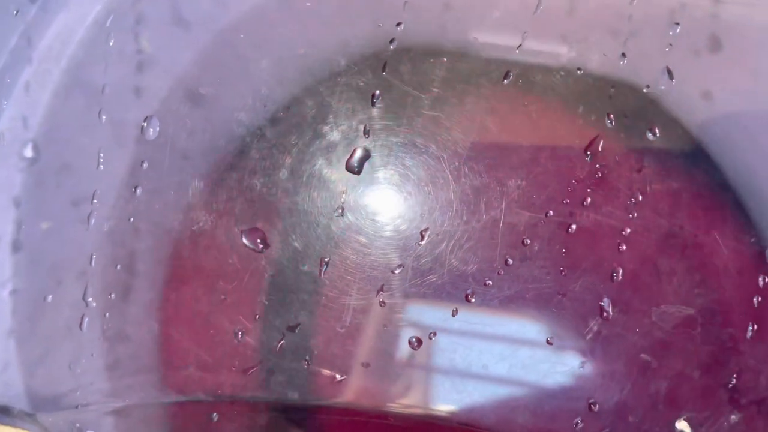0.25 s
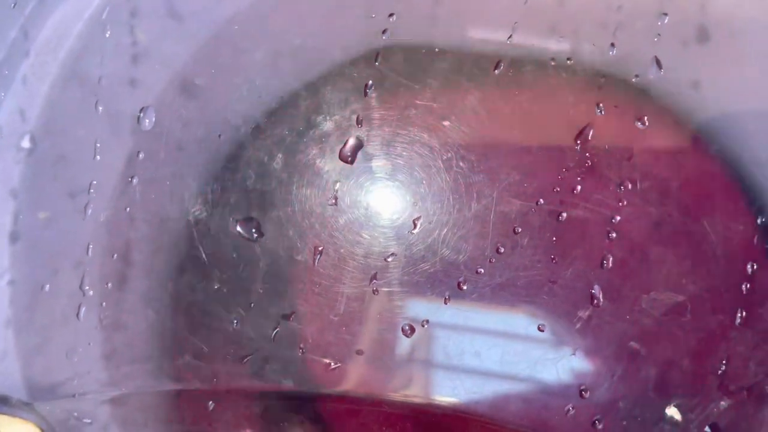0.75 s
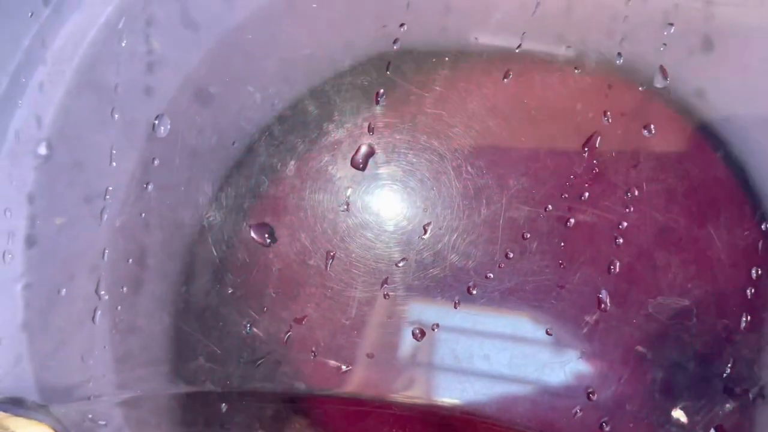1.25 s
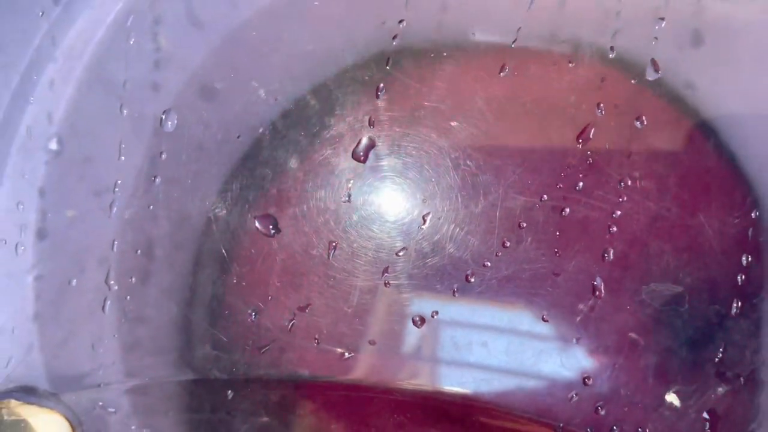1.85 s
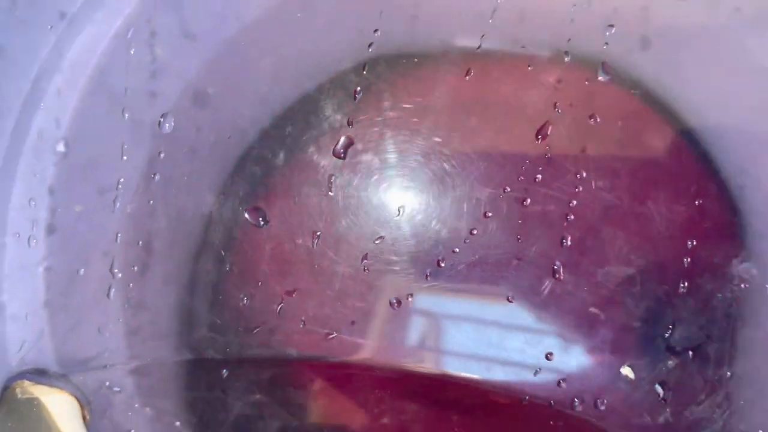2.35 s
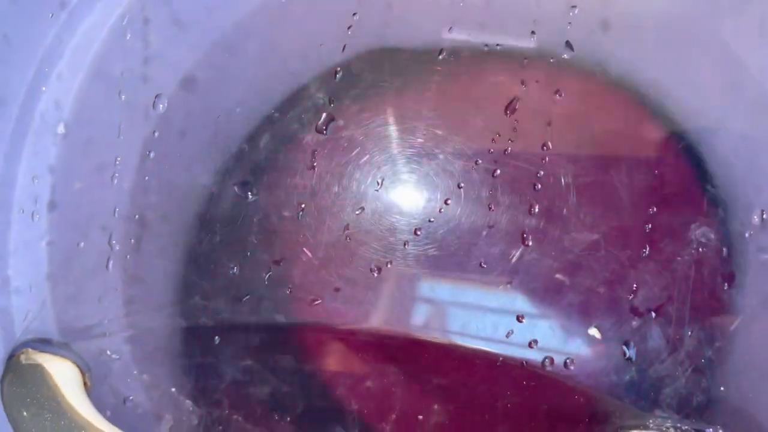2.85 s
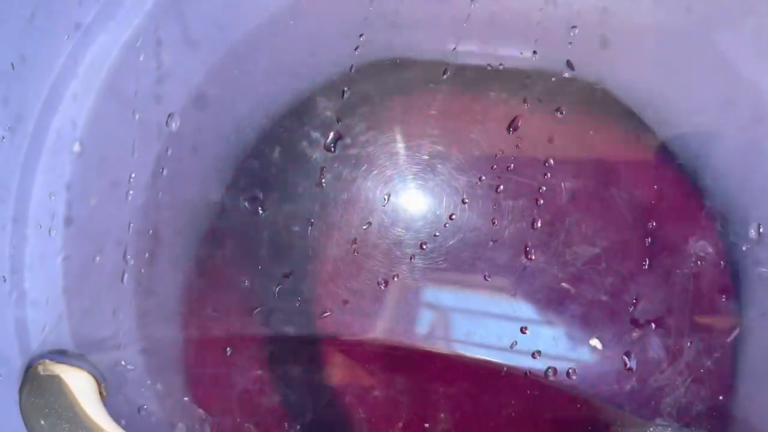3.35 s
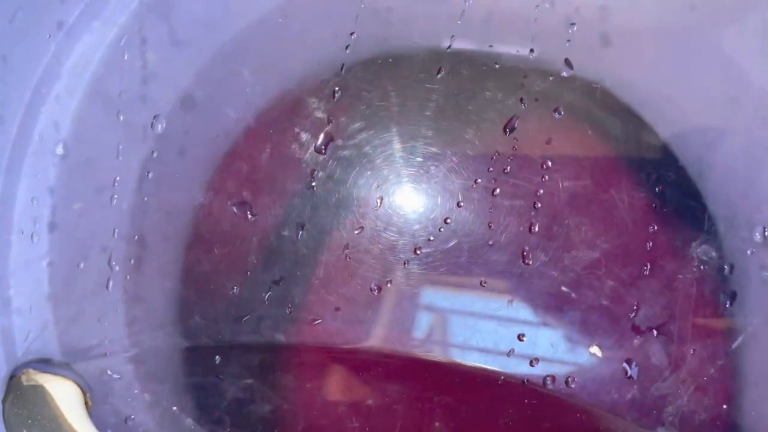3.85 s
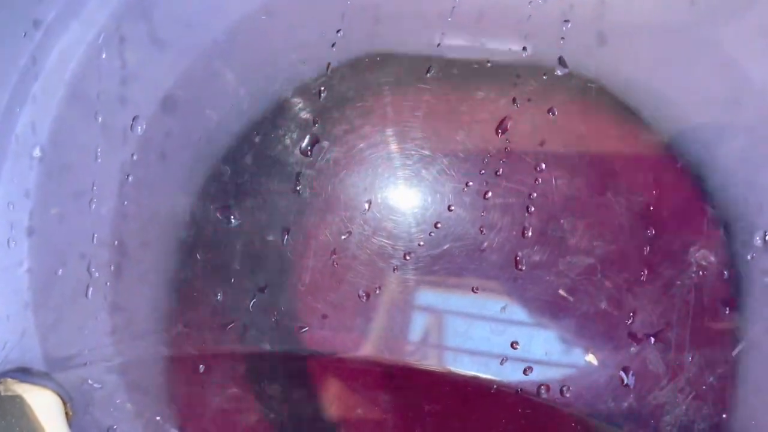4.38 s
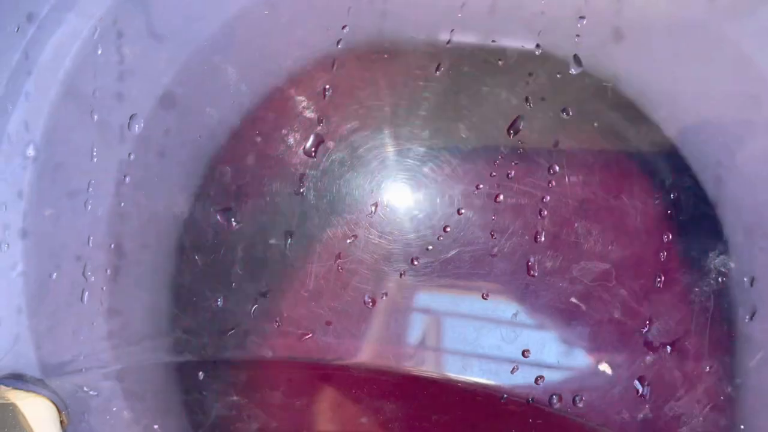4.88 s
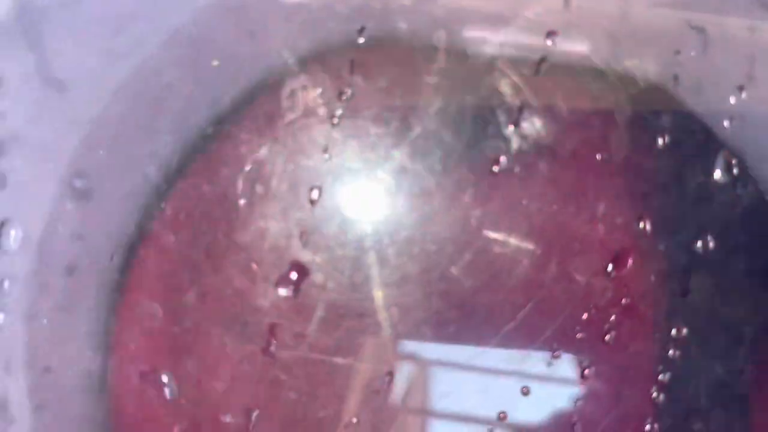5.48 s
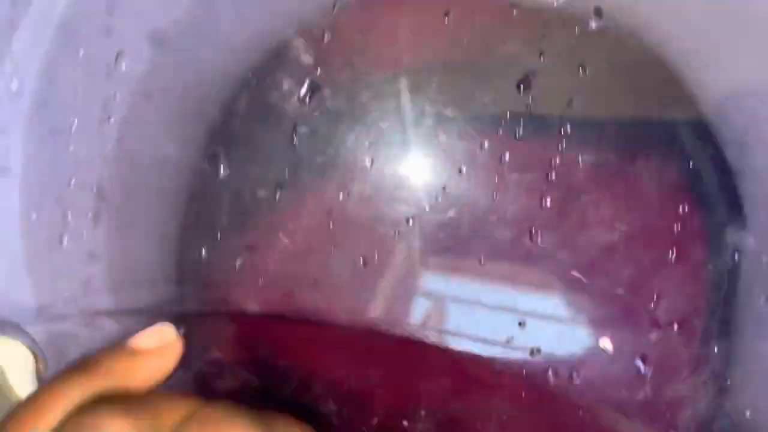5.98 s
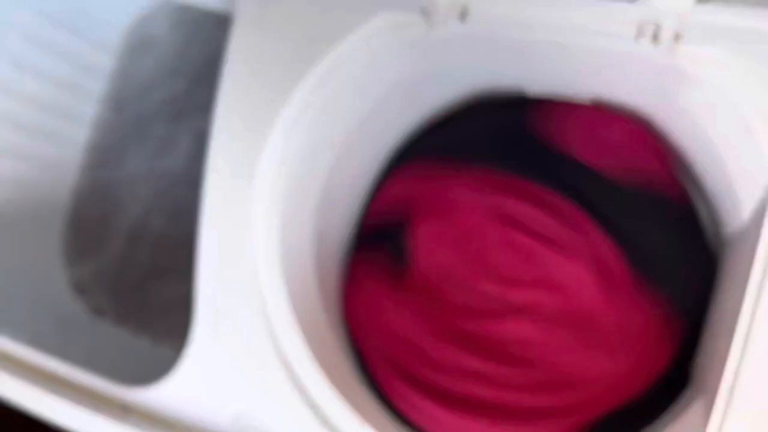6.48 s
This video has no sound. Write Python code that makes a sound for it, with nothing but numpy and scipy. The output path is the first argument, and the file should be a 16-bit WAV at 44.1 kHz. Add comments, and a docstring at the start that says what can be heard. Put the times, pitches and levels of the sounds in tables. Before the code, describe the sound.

Close beside a small plastic washer, an unbalanced spin tub whirls about ten times a second, bumping, knocking and rattling under a rush of air and spray while a timer ticks rapidly. It slows slightly. The sound drops almost to nothing for an instant, then returns softer and looser as the tub coasts. A hand knocks and lifts the plastic lid, and wet cloth swishes brightly before the air dies down.

```python
"""The spin tub of a small plastic washer whirls an uneven load, slowing a little: struck modes make its bumps,
knocks and taps, filtered noise its rattles and its whirl of air and spray. The sound dips briefly almost to
nothing and returns with the tub coasting, as a low noise swelling each turn. Ringing modes and short noise
cracks make the lid's knocks as a hand lifts it; brighter noise makes the wet cloth swish. A spring timer ticks
beside it in small puffs of noise. A pair of microphone ports hears all this close by."""
import sys
import numpy as np
from scipy import signal
from scipy.fft import rfft, irfft, next_fast_len
from scipy.io import wavfile
from scipy.ndimage import uniform_filter1d

SR = 44100
rng = np.random.default_rng(int(sys.argv[2]) if len(sys.argv) > 2 else 0)


def file_out(sig):
    """Save sig as 16-bit WAV at sys.argv[1]."""
    # one column per channel
    cols = np.atleast_2d(sig).T
    # limit, then scale
    lim = np.clip(cols, -1, 1)
    pcm = np.round(lim * 32767).astype(np.int16)
    wavfile.write(sys.argv[1], SR, pcm)


def boost(x):
    """Linear amplitude factor 10**(x/20) for a level x in decibels (scalar or array-like)."""
    u = np.asarray(x, float) / 20
    return 10 ** u


N = 296352
TIME = np.arange(N) / SR   # seconds
DIP_S, LID_UP_S = 5.447, 6.324   # the brief dip in level; the lid is up


def rms_one(x):
    """Scales to rms 1."""
    return x / np.sqrt(np.mean(x ** 2) + 1e-20)


def in_time(rows):
    """Columns of a table, whose first column is seconds, as curves over all samples."""
    s, *columns = np.transpose(rows)
    return [np.interp(TIME, s, c) for c in columns]


def drift(rate_hz):
    """Slow random wandering of spread 1: noise through two low-pass poles, made at every 40th sample."""
    r = np.exp(-80 * np.pi * rate_hz / SR)
    white = rng.standard_normal(N // 40 + 2002)
    slow = signal.lfilter([1], [1, -2 * r, r * r], white)[2000:]
    return np.interp(np.arange(N) / 40, np.arange(len(slow)), rms_one(slow))


def ring(clicks, hz, t60):
    """A unit click sets a sine of height 1 ringing; it falls by 60 dB in t60 seconds."""
    r, w = boost(-60 / (t60 * SR)), 2 * np.pi * hz / SR
    return signal.lfilter([0, np.sin(w)], [1, -2 * r * np.cos(w), r * r], clicks + 1e-18)


def resonance(x, hz, width_hz):
    """Band-pass of gain 1 at its top."""
    r = np.exp(-np.pi * width_hz / SR)
    feedback = [1, -2 * r * np.cos(2 * np.pi * hz / SR), r * r]
    return signal.lfilter(np.array([1, 0, -1]) * (1 - r * r) / 2, feedback, x)


def band_pass(x, low_hz, high_hz):
    """Keeps one band of a sound."""
    return signal.sosfilt(signal.butter(2, [low_hz, high_hz], "band", fs=SR, output="sos"), x)


def burst(clicks, t60, rise_s):
    """Each click starts a puff of noise that swells quickly and dies away."""
    rise = np.exp(-1 / (rise_s * SR))
    fall = signal.lfilter([1], [1, -boost(-60 / (t60 * SR))], clicks + 1e-18)
    return rng.standard_normal(N) * signal.lfilter([1 - rise], [1, -rise], fall)


def firmness_db(s, firmest_db, firmest_s, fade_db):
    """A contact weakens with the square of the time from its firmest moment."""
    return firmest_db - abs(fade_db) * (s - firmest_s) ** 2


def passes_of(turns, fraction):
    """Samples at which the tub passes one place in its turn."""
    return np.flatnonzero(np.diff(np.floor(turns - fraction)) == 1)


def track(turns, wear_turns):
    """Roughness around the rim: nearly the same noise returns each turn, blending slowly into another."""
    rims = rng.standard_normal((12, 4400))
    place = ((turns % 1) * (rims.shape[1] - 1)).astype(int)
    age = np.clip(TIME * 10 / wear_turns, 0, len(rims) - 1.001)   # counts about 10 turns per s
    first, blend = age.astype(int), np.pi / 2 * (age % 1)
    return np.cos(blend) * rims[first, place] + np.sin(blend) * rims[first + 1, place]


def tub_turns():
    """Turns made so far: a slowing spin, then steady coasting; the count jumps at the dip."""
    start_turns_per_s, slowing_per_s, coast_turns_per_s = 10.3153, .015648, 8.5
    coast_turn = .86   # where in its turn the tub is after the dip
    after = TIME > DIP_S
    spin = start_turns_per_s * np.exp(-slowing_per_s * TIME)
    turns = np.cumsum(np.where(after, coast_turns_per_s, spin)) / SR
    first = turns[after][0]
    return turns + after * (np.ceil(first) - first + coast_turn)


def contacts(turns, places, modes, uneven_db):
    """Every pass of a contact place strikes the modes; neighbouring modes answer in opposite sense."""
    clicks = np.zeros(N)
    for fraction, *firmness in places:
        at = passes_of(turns, fraction)
        clicks[at] += boost(firmness_db(TIME[at], *firmness) + uneven_db * rng.standard_normal(len(at)))
    return sum((-1) ** k * boost(db) * ring(clicks, hz, t60) for k, (hz, db, t60) in enumerate(modes))


def bumps(turns):
    """Until the dip the tub bumps its soft mounts and its rim knocks the cover, ringing cabinet and cover."""
    # Where the tub bumps its soft mounts. Each row: place as a fraction of a turn, firmest level in dB,
    # firmest moment in seconds, fade in dB per second squared.
    mount_places = [(0.042, -15.6, 1.21, 3.24), (0.181, -21.9, 5.38, 3.26), (0.251, -13.4, 1.38, 3.12),
                    (0.318, -16.2, 4.41, .6), (0.386, -19.6, 2.66, .83), (0.474, -11, 2.56, .29),
                    (0.508, -14.7, 6.5, .13), (0.676, -11, .74, .25), (0.703, -9.8, .61, .47),
                    (0.798, -3.4, 1.11, 1.44), (0.828, -2.9, 1.14, 1.95), (0.892, -11, 3.79, 1.77),
                    (0.989, -16.8, 6.5, .03)]
    # Ringing modes of the cabinet. Each row: pitch in Hz, level in dB, time to fall 60 dB in seconds.
    cabinet_modes = [(57.2, -24.6, 0.5), (118.8, -9.2, 0.042), (132.9, -3.2, 0.111), (176.4, -6.4, 0.08)]
    # Where the rim knocks the tub cover. Each row: place as a fraction of a turn, firmest level in dB,
    # firmest moment in seconds, fade in dB per second squared.
    rim_places = [(0.033, -14.6, -1, .38), (0.636, -14, -1, .18), (0.756, -14.7, 2.02, 1.91),
                  (0.798, -13.1, 1.15, 2.79), (0.927, -11.3, .77, 2.24), (0.929, -13, 3.6, 7.76)]
    # Ringing modes of the cover. Each row: pitch in Hz, level in dB, time to fall 60 dB in seconds.
    cover_modes = [(249.6, -12.3, 0.097), (350.7, -9.5, 0.12), (409.7, -23.6, 0.139), (452, -20, .12),
                   (532, -22, 0.072), (790, -25, .05), (890, -24, .05)]
    bump_creep, knock_creep = .00628, .00992   # the places come later as the tub slows, turns per s
    soft = contacts(turns - bump_creep * TIME, mount_places, cabinet_modes, uneven_db=-0.27)
    firm = contacts(turns - knock_creep * TIME, rim_places, cover_modes, uneven_db=-1.0)
    dull = signal.sosfilt(signal.butter(2, 420, fs=SR, output="sos"), soft)
    hard = signal.sosfilt(signal.butter(2, 160, "high", fs=SR, output="sos"), firm)
    return -(dull + hard) * (TIME < DIP_S)   # turned over: each starts as a suction


def taps(turns, uneven_db):
    """Small parts of the tub tap once a turn; each tap rings the modes nearest its pitch most."""
    # The tapping parts. Each row: place as a fraction of a turn, pitch in Hz, firmest level in dB,
    # firmest moment in seconds, fade in dB per second squared.
    tap_places = [(.39, 380, -22, 5.7, -0.5), (0.133, 340, -20, 4.9, 3), (0.61, 340, -23.5, 5.1, 9),
                  (0.133, 351, -29, 1.2, -5.5), (.49, 580, -22, 0.39, 10), (.665, 534, -28.5, 2.3, 0.5),
                  (1, 260, -29, 1.6, 1), (0.058, 510, -31.5, 1.2, 2), (0.27, 380, -24, 4.4, 18),
                  (0.72, 544, -23.5, 4.7, 5.5), (0.42, 440, -25, 5.9, -0.5), (0.0315, 390, -32, 6.5, 2),
                  (0.45, 744, -31.5, 5.3, 1.5), (0.66, 690, -23, 0.35, 10), (.76, 596, -27, 4.8, 1.5),
                  (1, 610, -28, 1.4, 6), (.595, 850, -26.5, 4.8, 7), (.69, 880, -24.5, 5.2, 4),
                  (0.78, 895, -27, 1, 0.5), (0.45, 830, -22, 0.88, 1), (0.0338, 970, -29, 0.76, 0),
                  (0.49, 1030, -37, 0.48, -7), (.455, 1060, -33.5, 7, -2), (0.55, 895, -27, 4.2, -2),
                  (0.57, 610, -54, 3.2, 13), (.76, 1020, -31, 1.2, 1.8), (0.0652, 1210, -31, 0.53, 2),
                  (0.0255, 1410, -23, 4.6, 2), (0.0453, 1590, -32, 3, 3), (0.31, 1590, -34, 2.3, 0.5),
                  (0.76, 1590, -38, 0.48, 0), (0.54, 1590, -43.5, 4.3, -12), (.445, 2700, -26, 2.6, 0.5),
                  (.445, 1190, -28, 4.1, 2.5)]
    # Ringing modes of those parts. Each row: pitch in Hz, level in dB, time to fall 60 dB in seconds.
    part_modes = [(341.5, -0.5, 0.081), (351.2, 1.5, 0.054), (446.7, 3, 0.063), (537, -1, 0.033),
                  (612, 0, .05), (663, 0.5, 0.048), (796, -5.5, 0.11), (896, 1.5, 0.047),
                  (1047, 2.5, 0.028), (1080, 0.5, 0.07), (1228, -2, 0.053), (1605, 0, 0.042),
                  (2620, 6, .01), (2930, 3, 0.01)]
    creep, db_per_octave = .006, 45   # places come later, turns per s; loss away from the tap's pitch
    crept, out = turns - creep * TIME, 0
    strikes = []
    for fraction, pitch_hz, *firmness in tap_places:
        at = passes_of(crept, fraction)
        force_db = firmness_db(TIME[at], *firmness) + uneven_db * rng.standard_normal(len(at))
        strikes.append((at, force_db, pitch_hz))
    for k, (hz, mode_db, t60) in enumerate(part_modes):
        clicks = np.zeros(N)
        for at, force_db, pitch_hz in strikes:
            clicks[at] += boost(force_db + mode_db - db_per_octave * abs(np.log2(hz / pitch_hz)))
        out = out + (-1) ** k * ring(clicks, hz, t60)
    return out * (TIME < LID_UP_S)


def rattles(turns, uneven_db, loose_hz):
    """Rim roughness shakes loose parts over an arc of each turn; the higher parts repeat less exactly."""
    # Resonances of the loose parts. Each row: pitch in Hz, width in Hz, level while coasting in dB.
    loose_parts = [(1209, 134, -31.5), (368.2, 41, -33.5), (246.4, 98, -43), (535, 80, -38),
                   (2570, 1100, -35), (1042, 105, -38), (886, 85, -38), (1563, 190, -44), (9860, 4700, -52),
                   (450, 40, -53), (3166, 120, -47), (3166, 79, -46), (3870, 190, -53), (3930, 61, -57),
                   (597, 70, -36), (1081, 46, -41.5)]
    # When each part rattles or rubs. Each row: place as a fraction of a turn, length in turns,
    # firmest level in dB, firmest moment in seconds, fade in dB per second squared.
    rubs = [(0.471, 0.035, -35.5, 3.8, 1.5), (0.73, 0.22, -31, 0.22, 0.8), (0.904, 0.26, -30.5, 6.6, 0.5),
            (0.65, 0.08, -33, 0.88, 1), (0.029, 0.058, -32, 0.052, -3.5), (0.079, 0.037, -31.5, 0.3, -3.5),
            (0.56, 0.057, -30.5, 3.9, 4), (1.009, 0.067, -40.5, 1.3, -0.1), (0.45, 0.042, -32, 3, -20),
            (0.47, 0.14, -35.5, 4.5, .5), (0.415, 0.069, -38.5, 5.1, -0.5), (0.983, 0.058, -38.5, 4.6, .4),
            (0.41, 0.04, -38.5, 4.5, .5), (0.885, 0.032, -38, 3.9, 3.2), (0.516, 0.093, -31.5, 2.5, .1),
            (0.43, 0.077, -39.5, 4, 0.7)]
    settle_s = 0.49   # the levels ease to coasting
    out, rough = 0, track(turns, wear_turns=8.89)
    settled = np.clip((TIME - DIP_S) / settle_s, 0, 1)
    for (hz, width_hz, coast_db), (fraction, length, *firmness) in zip(loose_parts, rubs):
        since = ((turns - fraction + length) % 1) / length
        arc = since * np.exp(1 - since)   # swells to 1, then dies away
        repeat = np.exp(-(hz / loose_hz) ** 2)
        source = np.sqrt(repeat) * rough + np.sqrt(1 - repeat) * rng.standard_normal(N)
        level_db = (1 - settled) * firmness_db(TIME, *firmness) + settled * coast_db
        level_db = level_db + uneven_db * drift(2.8)
        noise = rms_one(resonance(resonance(source, hz, width_hz), hz, width_hz))
        # evens out the noise's level over about 20 ms
        local_level = np.sqrt(uniform_filter1d(noise ** 2, size=900) + 0.11)
        out = out + boost(level_db) * arc * noise / local_level
    return out * (TIME < LID_UP_S)   # the raised lid silences the rattles


def whirl_strength():
    """Level, treble and swish in dB: falling with the spin, lower when coasting, brightened by wet cloth."""
    # Swishes of wet cloth. Each row: middle in seconds, half length in seconds,
    # extra dB in the highest bands (less in lower ones).
    cloth = [(6.455, 0.094, 6.5), (6.578, 0.05, 13), (6.72, 0.13, 10.5)]
    spin_db, loss_db_per_s, coast_db = -27, 0.56, -31
    still_s, still_loss_db_per_s = 6.66, 79   # the air comes to rest
    spinning = TIME < DIP_S
    level_db = np.where(spinning, spin_db - loss_db_per_s * TIME, coast_db)
    level_db = level_db - still_loss_db_per_s * np.maximum(TIME - still_s, 0)
    swish_db = sum(db * np.maximum(1 - np.abs(TIME - s) / half_s, 0) for s, half_s, db in cloth)
    return level_db, np.where(spinning, -5, -3.7), swish_db


def whirl(turns, patchy_db, spray_db):
    """Air and spray: third-octave noise bands that flicker partly together; droplets add fine clicks."""
    # Tone colour of the air, before the whole is set to its level. Each row: pitch in Hz, level in dB per Hz.
    colour = [(40, -38), (75, -4), (150, -6.5), (290, -16), (370, -12), (480, -18), (610, -11), (850, -12),
              (980, -17), (1200, -18.5), (1900, -21.5), (2600, -16), (3000, -14), (3900, -22.5),
              (4700, -20), (6400, -22.5), (8000, -23), (11000, -20), (12200, -23.5), (13300, -49),
              (14500, -59)]
    strict_hz, strict_share = 1700, .7   # the duller rumble returns nearly alike each turn
    pump_db, pump_turn = 2.5, 0.62   # the lopsided load pumps the duller air once a turn
    lid_up_bass_db, bass_hz = -4, 330   # with the lid up the cabinet is no longer drummed
    level_db, treble_db, swish_db = whirl_strength()
    hz_points, db_points = np.transpose(colour)
    edges, together, out = np.geomspace(40, 15500, 27), drift(25.0), 0
    falls = rng.random(N) < 400 / SR   # about 400 drops per second
    drops = falls * boost(5.1 * np.minimum(rng.exponential(1, N), 4)) * rng.choice([-1, 1], N)
    # two sets that take turns among the bands, each of one direct and two scattered paths
    white = rng.standard_normal((2, 3, N))
    rim = np.array([[track(turns, wear_turns=7.71) for path in paths] for paths in white])
    for k, (low, high) in enumerate(zip(edges, edges[1:])):
        hz = np.sqrt(low * high)
        bright = np.clip(np.log2(hz / 900) / 2, 0, 1)
        sizzle = np.clip(np.log2(hz / 2200) / 2, 0, 1)
        strict = strict_share * np.exp(-(hz / strict_hz) ** 2) * (TIME < DIP_S)
        source = np.sqrt(strict) * rim[k % 2] + np.sqrt(1 - strict) * white[k % 2]
        source = source + bright * boost(spray_db) * rms_one(drops)
        noise = band_pass(source, low, high)
        colour_db = np.interp(np.log(hz), np.log(hz_points), db_points)
        swell_db = (1 - bright) * pump_db * np.cos(2 * np.pi * (turns - pump_turn))
        swell_db = swell_db + lid_up_bass_db * (hz < bass_hz) * (TIME > LID_UP_S)
        flicker_db = patchy_db * (bright * together + drift(42.0))
        band_db = colour_db + swell_db + bright * treble_db + sizzle * swish_db + flicker_db
        out = out + boost(band_db) * noise
    return boost(level_db) * rms_one(out)


def grumble(turns):
    """After the dip the tub rocks loosely: low noise swells once a turn, in place of the strict beat."""
    # Rocking of the coasting tub. Each row: time in seconds, level in dB of its low part before the swell.
    rocking = [(5.47, -28), (5.62, -31), (5.96, -28), (6.11, -29.5), (6.3, -36), (6.45, -42), (6.72, -43)]
    rocking_db, = in_time(rocking)
    shaking = band_pass(rng.standard_normal(N), 223, 450)
    groan = resonance(shaking, 268, 46) - 0.94 * resonance(shaking, 345, 52)   # the cover groans
    groan = groan + 0.85 * resonance(shaking, 378, 140)
    low = band_pass(rng.standard_normal(N), 78, 176)
    swell_db = 0.82 * np.cos(2 * np.pi * (turns - .3))
    rough = boost(1.0) * rms_one(low) + boost(-2.2) * rms_one(groan)
    return rough * boost(rocking_db + swell_db) * (TIME > DIP_S)


def lid():
    """Each touch makes the plastic lid thump, most in the modes near its pitch, with a short noise crack."""
    # Knocks by the rocking tub and then by the hand. Each row: time in seconds, thump strength in dB,
    # pitch in Hz, crack strength in dB; modes and filters below shape the final levels.
    touches = [(5.475, -19, 412, -21.5), (5.489, -22, 128, -38), (5.564, -21, 330, -40),
               (5.59, -17, 298, -33), (5.645, -22, 100, -36), (5.702, -16, 135, -37),
               (5.826, -23, 268, -43), (5.834, -23, 268, -43), (5.87, -30, 410, -23),
               (5.881, -11, 120, -40), (5.97, -19, 400, -34), (6.005, -17, 70, -40), (6.053, -20, 400, -36),
               (6.148, -20.5, 255, -31), (6.224, -18.5, 402, -28), (6.284, -24, 520, -36),
               (6.292, -21, 450, -32), (6.305, -23, 500, -20), (6.311, -19, 440, -33),
               (6.3243, -14, 240, -36), (6.328, -7, 98, -43), (6.3961, -11, 400, -22),
               (6.3995, -16, 200, -38), (6.4, -15, 86, -38), (6.356, -25, 700, -19), (6.387, -27, 410, -35),
               (6.395, -14, 645, -28), (6.437, -22, 700, -22), (6.446, -18.5, 500, -24),
               (6.452, -20, 440, -30), (6.491, -18, 128, -40), (6.501, -21.5, 600, -19.5),
               (6.566, -24, 400, -37), (6.6, -19.5, 560, -24), (6.609, -22, 410, -34),
               (6.63, -22, 402, -36), (6.645, -16, 134, -45), (6.654, -30, 287, -24),
               (6.679, -21.5, 600, -40)]
    # Ringing modes of the lid. Each row: pitch in Hz, level in dB, time to fall 60 dB in seconds.
    plastic_modes = [(64, -2, .12), (86, 0, .085), (128, -2, .1), (198, -3, .04), (268, 2, .1),
                     (340, -1, .03), (410, 0, .05), (510, -2, .045), (600, -2, .03), (890, -2, .045),
                     (1000, -2, .036)]
    db_per_octave = 24   # loss away from the pitch of the touch
    s, db, pitch_hz, crack_db = np.transpose(touches)
    at, out, cracks = (s * SR).astype(int), 0, np.zeros(N)
    cracks[at] = boost(crack_db)
    for hz, mode_db, t60 in plastic_modes:
        clicks = np.zeros(N)
        clicks[at] = boost(db + mode_db - db_per_octave * np.abs(np.log2(hz / pitch_hz)))
        out = out + ring(clicks, hz, t60)
    snap = burst(cracks, 0.014, rise_s=0.00014)
    return out + boost(9.0) * resonance(snap, 1700, 1800) - boost(1.5) * resonance(snap, 9400, 5000)


def timer(weak_db, uneven_db, t60):
    """Tick and tock, every second beat weaker, shake the timer's small metal parts for some milliseconds."""
    # Pace of the ticking. Each row: start in seconds, beats per second.
    pace = [(0, 39.57), (3.2, 39.16), (4.119, 41.29), (5.42, 39.45)]
    # Strength of the strong beats, before a fixed boost. Each row: time in seconds, level in dB.
    strong_beats = [(0, -34), (1.2, -33.5), (2.5, -32.5), (4, -31), (5.2, -29), (6.3, -34)]
    # Resonances of the metal parts. Each row: pitch in Hz, width in Hz, level in dB.
    metal_parts = [(2510, 350, 1.5), (3720, 560, 0), (6430, 710, 0), (8580, 206, 11), (10460, 3050, -4)]
    beats_at_start, last_beat = -.22, 253
    from_s, rate = np.transpose(pace)
    beats = beats_at_start + np.cumsum(rate[np.searchsorted(from_s, TIME, "right") - 1]) / SR
    beat = np.arange(1, last_beat + 1)
    at_s = np.interp(beat, beats, TIME) + 0.00065 * rng.standard_normal(last_beat)
    clicks = np.zeros(N)
    beat_db = weak_db * (beat % 2 == 0) + uneven_db * rng.standard_normal(last_beat)
    clicks[(at_s * SR).astype(int)] = boost(beat_db)
    puffs = boost(in_time(strong_beats)[0] + 15.5) * burst(clicks, t60, rise_s=0.00056)
    return sum((-1) ** k * boost(db) * resonance(puffs, hz, width)
               for k, (hz, width, db) in enumerate(metal_parts))


def ports(solid, air, spread_s, solid_scatter):
    """Each port hears direct sound in its own phase plus scatter, which only smears the solid parts' phase."""
    # How the two ports differ. Each row: pitch in Hz, lead of the left in radians,
    # likeness from 0 to 1, left over right in dB.
    pair = [(60, 0, .975, 0), (200, 0, .98, .3), (280, -.1, .96, .5), (310, -.25, .95, 2),
            (345, -.2, .95, 1), (400, -.7, .8, 3), (455, -1.1, .8, 3.5), (525, -1, .5, 4),
            (580, -2.5, .65, -2.5), (640, -2.3, .3, -1), (720, -3.2, .65, -3), (780, -3, .4, 0),
            (835, -2.7, .8, -1.5), (895, -1.9, .65, .5), (955, -3.6, .6, -1), (1070, -5, .15, 0),
            (1210, -6.8, .75, -5), (1300, -7.3, .5, -3.5), (1470, -6.5, .1, -4), (1610, -5.6, .45, -3),
            (2300, -7.4, .25, 2), (3000, -8.3, .5, 0), (4000, -7.2, .35, 0), (4700, -9, .55, -2),
            (6000, -6.28, .9, 0), (7500, -4.8, .6, 0), (8400, -3.2, .95, 0), (9600, -3.1, .95, 0),
            (10000, -2, .85, 0), (11000, -1.3, .85, 0), (11900, -.35, .94, 0), (15000, 0, .94, 0)]
    size = next_fast_len(N + 4096)
    hz = np.arange(size // 2 + 1) * SR / size
    columns = np.transpose(pair)
    lead, alike, balance_db = [np.interp(hz, columns[0], c) for c in columns[1:]]
    alike = np.clip(alike, 0, 1)
    tail = rng.standard_normal((2, 4096)) * np.exp(-np.arange(4096) / (spread_s * SR))
    reflections = np.exp(1j * np.angle(rfft(tail, size)))
    side = np.array([[.5], [-.5]])   # left, right
    direct = np.sqrt(alike) * np.exp(1j * side * lead)
    scattered = np.sqrt(1 - alike) * reflections
    near = np.exp(1j * np.angle(direct + solid_scatter * scattered))
    heard = near * rfft(solid, size) + direct * rfft(air[0], size) + scattered * rfft(air[1:], size)
    return irfft(heard * boost(side * balance_db), size)[:, :N]


def scene():
    """All sources at the two ports, with the brief dip in level."""
    turns = tub_turns()
    tub = bumps(turns) + taps(turns, uneven_db=2.5) + rattles(turns, uneven_db=1.34, loose_hz=1340)
    solid = tub + grumble(turns) + lid() + timer(weak_db=-5.5, uneven_db=0.9, t60=0.032)
    air = whirl(turns, patchy_db=1.47, spray_db=-3.5)
    dip = np.clip(np.abs(TIME - DIP_S) / 0.03, .03, 1) ** 1.3   # 0.03 s to either side
    return ports(solid, air, spread_s=0.011, solid_scatter=0.77) * dip


def band_limit(x):
    """A steep low-pass at the top of the band."""
    return signal.sosfilt(signal.butter(12, 15710, fs=SR, output="sos"), x)


def record(dry):
    """Filters take away the deepest bass and the highest treble."""
    cut = signal.sosfilt(signal.butter(3, 46, "high", fs=SR, output="sos"), dry)
    mix = signal.sosfilt(signal.cheby2(8, 50, 14800, fs=SR, output="sos"), cut)
    return band_limit(mix)


dry = scene()
out = record(dry)
file_out(out)
```